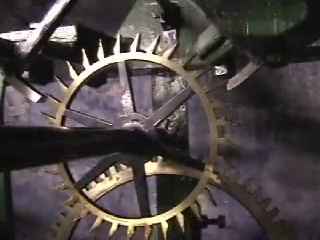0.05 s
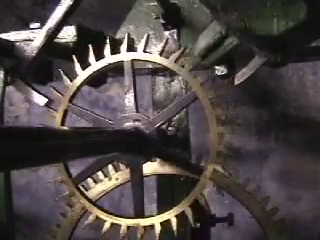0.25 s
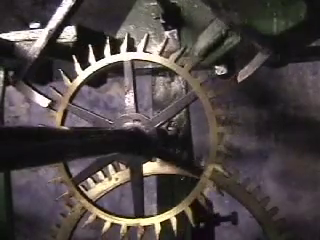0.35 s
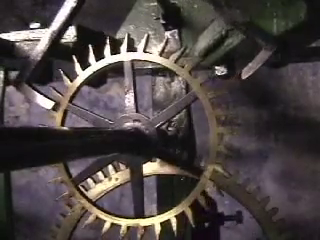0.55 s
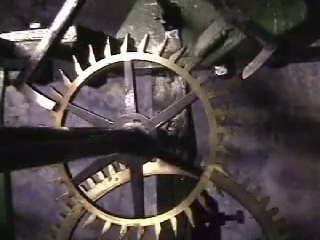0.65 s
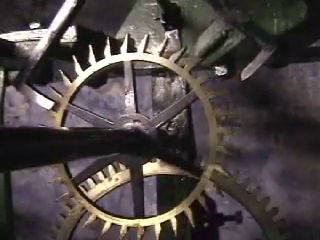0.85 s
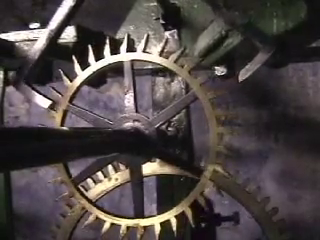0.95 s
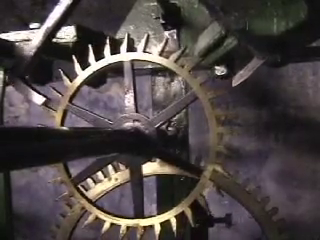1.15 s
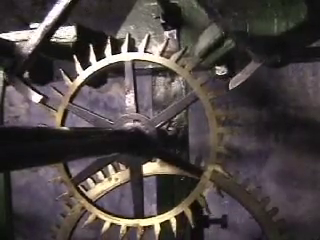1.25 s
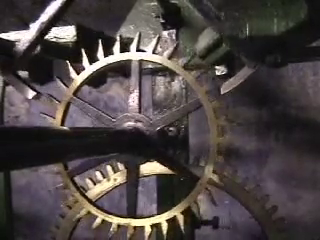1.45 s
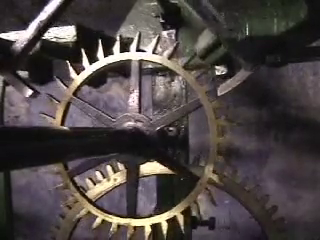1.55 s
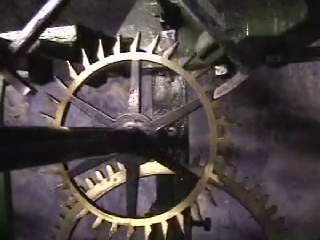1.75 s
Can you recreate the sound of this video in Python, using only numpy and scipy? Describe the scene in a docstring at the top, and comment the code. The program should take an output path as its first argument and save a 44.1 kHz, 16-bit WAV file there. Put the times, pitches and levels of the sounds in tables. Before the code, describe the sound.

A big clock escapement heard very close: one sharp, chattering metal clack, then over a second later another with a light tick just behind it, each ringing briefly over low hum, faint motor whine and hiss.

```python
"""Tower clock escapement, heard close

A tooth drops onto one pallet and, a swing later, onto the other, over hum, hiss and a small motor's whine.
Each drop is shaped noise for the chattering clang, decaying sines for wheel and anchor, swelling sines
for the boom of iron frame and small room, and a faint noise tail for the room's late answer.
Hum and motor are sines, the hiss is coloured noise; the recorder's gain dips at each drop."""
import sys
import numpy as np
from scipy import signal
from scipy.fft import rfft, irfft
from scipy.io import wavfile
from scipy.ndimage import uniform_filter1d

SR = 44100
rng = np.random.default_rng(int(sys.argv[2]) if len(sys.argv) > 2 else 0)


def dump(signal):
    """Clip the signal to [-1, 1] and save it as 16-bit WAV at the path in sys.argv[1]."""
    limited = np.clip(np.atleast_2d(signal).T, -1, 1)
    pcm = np.round(limited * 32767).astype(np.int16)
    wavfile.write(sys.argv[1], SR, pcm)


N = 79380
TIME_S, FREQ_HZ = np.arange(N) / SR, np.fft.rfftfreq(N, 1 / SR)
CONTACT_RISE_S = 0.00029  # time constant of the attack where metal meets metal


def amp(db):
    """Decibels to gain."""
    return 10 ** (np.asarray(db) / 20)


def unit(x):
    """Scales to rms 1."""
    return x / np.sqrt(np.mean(x ** 2) + 1e-20)


def read(hz, values):
    """A curve over frequency through the given points, on a log-frequency axis."""
    return np.interp(np.log(FREQ_HZ + 1), np.log(np.abs(hz)), values)


def bell(at_hz, centre_hz, octaves):
    """A Gaussian hump over log frequency; its standard deviation is given in octaves."""
    return np.exp(-.5 * (np.log2(at_hz / centre_hz) / octaves) ** 2)


def noise(gain):
    """Coloured noise for two nearly alike channels."""
    spread = .18  # weight of the part that is opposite in the two ears
    common, apart = rng.standard_normal((2, N))
    pair = common + spread * np.array([apart, -apart])
    return irfft(rfft(pair) * gain, N)


def decay(age, t60):
    """Exponential decay by 60 dB in t60 seconds."""
    return np.exp(-np.log(1000) * age / t60)


def fade(start, rise, t60):
    """An envelope that rises quickly and dies exponentially; silent before its start."""
    age = np.maximum(TIME_S - start, 0)
    return (1 - np.exp(-age / rise)) * decay(age, t60)


def tone(hz):
    """A sine of random phase."""
    return np.sin(2 * np.pi * (hz * TIME_S + rng.random()))


def wander(count):
    """Smooth random curve of rms 1 that changes over the given number of steps."""
    window = np.hanning(2 * int(count) + 3)
    return unit(signal.fftconvolve(rng.standard_normal(N), window, "same"))


def hum():
    """A low, slowly wavering hum: one sine whose phase sums its changing frequency."""
    # Each row: time in seconds, frequency in Hz, rms level in dB ahead of the microphones.
    hum_path = [(0, 50.1, -56), (.2, 50.8, -52), (.45, 51.65, -48.5), (.7, 51.04, -47), (.85, 51.65, -51.5),
                (1.0, 52.56, -48), (1.15, 52.64, -50), (1.35, 54.66, -50), (1.6, 55, -52), (1.8, 58.7, -62)]
    s, hz, db = np.transpose(hum_path)
    phase = 2 * np.pi * np.cumsum(np.interp(TIME_S, s, hz)) / SR
    return np.sqrt(2) * amp(np.interp(TIME_S, s, db)) * np.sin(phase)


def motor():
    """A small motor: a few clear lines over a fine buzz of high multiples of the shaft rate."""
    # The strongest lines. Each row: frequency in Hz, rms level in dB ahead of the microphones.
    whine_lines = [(449.5, -74), (599.4, -64), (1199, -75), (1349, -76.5), (1648, -73.5), (1798, -67.5),
                   (2347, -76), (2398, -78.5), (2997, -72), (3594, -71.5), (3817, -94), (3909, -72.5),
                   (4796, -73), (5395, -70.5), (5995, -80)]
    shaft_hz = 29.97
    buzz_db, line_spread_db, buzz_hz, buzz_octaves = -65.5, 7.5, 4020, 0.47
    whine = np.sqrt(2) * sum(amp(db) * tone(hz) for hz, db in whine_lines)
    orders_hz = shaft_hz * np.arange(25, 205)
    uneven = amp(line_spread_db * rng.standard_normal(len(orders_hz)))
    sizes = uneven * bell(orders_hz, buzz_hz, buzz_octaves)
    buzz = unit(sum(size * tone(hz) for size, hz in zip(sizes, orders_hz)))
    return whine + amp(buzz_db) * buzz


def hiss(left_db=2):
    """The quiet room and the microphones' own noise: the ears share less of it higher up."""
    # Colour of the hiss. Each row: frequency in Hz, relative density in dB per Hz.
    hiss_colour = [(25, -25), (55, -9), (90, -18.5), (130, -25), (180, -21), (300, -27.5), (500, -34),
                   (1000, -31), (1500, -37.5), (2100, -38), (4000, -36), (5800, -38.5), (6600, -43),
                   (7400, -55.5), (8200, -41), (9100, -35), (10200, -41.5), (11500, -47), (15000, -51),
                   (15800, -62)]
    # Each row: frequency in Hz, left-right likeness from 0 (separate) to 1 (the same).
    likeness = [(60, 0.85), (130, 0.82), (290, 0.2), (640, 0.58), (3100, 0.12), (6800, 0), (15000, 0)]
    hiss_db = -56.5  # rms over both channels before the left-right tilt
    left, other = rfft(rng.standard_normal((2, N)))
    same = np.clip(read(*np.transpose(likeness)), -1, 1)
    right = same * left + np.sqrt(1 - same ** 2) * other
    pair = irfft(np.array([left, right]) * amp(read(*np.transpose(hiss_colour))), N)
    return amp(hiss_db) * unit(pair) * amp([[left_db / 2], [-left_db / 2]])


def tick(start, db, hz, octaves, t60):
    """A light touch of metal on metal: a band of noise that dies quickly."""
    return amp(db) * unit(noise(bell(FREQ_HZ + 1, hz, octaves))) * fade(start, CONTACT_RISE_S, t60)


def clang(blows, pallet):
    """Countless close modes, fed by every contact; each band dies at its own rate."""
    # The dense clang of the works. Each row: frequency in Hz, relative density in dB per Hz
    # on the first pallet and on the second, t60 in seconds on the first and on the second.
    clang_bands = [(40, -29, -21, 0.54, .5), (90, -3.5, 1.5, 1, 0.73), (184, 3.5, 0.5, 0.54, 0.67),
                   (283, 2, 5.5, 0.43, 0.39), (480, 4.5, 1.5, 0.36, 0.41), (725, 3.5, 3, 0.29, 0.36),
                   (1120, 0, -5.5, 0.24, 0.37), (1670, 5, 8, 0.21, 0.22), (2400, -1, 1, 0.2, 0.2),
                   (3030, 3, 9, 0.17, 0.14), (4200, 1, -1, 0.18, 0.15), (5430, 1, 4.5, 0.26, 0.21),
                   (6620, -6.5, -2.5, 0.22, 0.17), (7500, -11.5, -15, 0.18, 0.29),
                   (8100, 1, 4.5, 0.21, 0.23), (10040, 1, -1.5, 0.19, 0.22),
                   (11100, -18, -10.5, 0.18, 0.19), (13100, -4, -8, 0.14, .17),
                   (15500, -15, -14, 0.12, 0.14)]
    clang_db = -16.5
    bloom_s = 0.012  # build-up at 100 Hz; shorter higher up
    crack_share, crack_s = 0.83, 0.066  # direct crack of each contact: share, t60
    clatter_db, clatter_s = 2, 0.0026  # uneven chatter: depth, grain
    ripple_db, ripple_hz = 2, 75.6  # some clusters of modes stand out: depth, width
    hz, *columns = np.transpose(clang_bands)
    db, t60 = columns[pallet], columns[2 + pallet]
    ripple = ripple_db * wander(ripple_hz * N / SR)[:len(FREQ_HZ)]
    spectrum = rfft(noise(amp(read(hz, db) + ripple)))
    out = np.zeros((2, N))
    for share, f, band_t60 in zip(np.eye(len(hz)), hz, t60):
        rise = CONTACT_RISE_S + bloom_s * 100 / f * min(1, 500 / f) ** .5
        power = 0
        for s, level, tilt in blows:
            envelope = fade(s, rise, band_t60) + crack_share * fade(s, rise, crack_s)
            power += (amp(level + tilt * np.log2(f / 3000)) * envelope) ** 2
        out += irfft(spectrum * read(hz, share), N) * np.sqrt(power)
    return amp(clang_db + clatter_db * wander(clatter_s * SR)) * out


def ring(blows, pallet):
    """The clear modes of wheel and anchor: sines topped up in power by every contact."""
    # Each row: frequency in Hz, relative level in dB on the first pallet and on the second,
    # t60 in seconds on the first and on the second.
    ring_modes = [(388.8, -34, -44, 0.47, 0.25), (429.2, -35.5, -25, 0.33, 0.29),
                  (480, -58, -30.5, .35, 0.3), (701, -26, -24, 0.29, 0.26), (754, -28, -30, 0.29, 0.41),
                  (950, -27, -28, 0.16, 0.22), (1114, -33, -36.5, 0.27, 0.47),
                  (1489, -27.5, -21, 0.25, 0.22), (1757, -27, -24.5, 0.13, 0.18),
                  (1843, -27, -39, 0.13, 0.16), (2254, -35, -30, 0.35, 0.19),
                  (2651, -28, -16.5, 0.18, 0.086), (2747, -22.5, -28, 0.14, 0.23),
                  (2920, -34, -31, 0.23, 0.3), (3190, -37, -18.5, 0.11, 0.11),
                  (3690, -19, -34, 0.053, 0.097), (4170, -22, -24, 0.1, 0.1), (4237, -42, -29, 0.28, 0.25),
                  (4390, -40, -23, .2, 0.13), (4486, -18.5, -32, .21, .22), (4760, -50, -32, 0.28, 0.29),
                  (5340, -28, -34, 0.16, 0.22), (5256, -20, -22, 0.15, 0.23),
                  (5298, -19.5, -29, 0.18, 0.21), (5413, -27.5, -22.5, 0.39, 0.22),
                  (5920, -31.5, -28, 0.34, .22), (6320, -33, -25, 0.2, 0.24), (7530, -34, -28.5, 0.17, 0.2),
                  (8220, -19, -34, 0.21, 0.23), (8520, -23, -18, 0.23, .23), (8660, -28, -22, 0.2, 0.19),
                  (9340, -25, -34, 0.11, .18), (9450, -22.5, -21.5, 0.15, 0.21),
                  (9450, -14.5, -40, 0.15, 0.19), (9660, -51, -24.5, 0.17, .2),
                  (9939, -23.5, -31, 0.17, .18), (10510, -27, -42, 0.17, 0.15),
                  (10839, -46, -36, .17, 0.19), (11570, -27.5, -33, 0.13, 0.18),
                  (12300, -30, -42, 0.12, .17)]
    ring_db = -2.5
    out = 0
    for hz, *row in ring_modes:
        power = sum((amp(db) * fade(s, CONTACT_RISE_S, row[2 + pallet])) ** 2 for s, db, _ in blows)
        out = out + amp(row[pallet]) * tone(hz) * np.sqrt(power)
    return amp(ring_db) * out


def boom(start, low_modes):
    """Low modes of frame and room, which swell before they fade."""
    out = 0
    for hz, db, swell, t60 in low_modes:
        growth = np.clip((TIME_S - start) / swell, 0, 1) ** 3
        fall = decay(np.maximum(TIME_S - start - swell, 0), t60)
        out = out + amp(db) * tone(hz) * growth * fall
    return out


def room(start):
    """The room's faint late answer: a dull noise tail that reaches each ear on its own."""
    # Each row: frequency in Hz, relative density in dB per Hz, t60 in seconds.
    room_bands = [(40, -13, 1.1), (120, -3, 1.3), (300, -1.5, 1), (780, -4, 1.1), (2820, -6, 0.81),
                  (5500, -16, 0.5), (7500, -40, .3), (15000, -50, .25)]
    room_db, rise_s = -30.5, 0.027
    hz, db, t60 = np.transpose(room_bands)
    spectrum = rfft(rng.standard_normal((2, N))) * amp(room_db + read(hz, db))
    return sum(irfft(spectrum * read(hz, share), N) * fade(start, rise_s, band_t60)
               for share, band_t60 in zip(np.eye(len(hz)), t60))


def drop(blows, low_modes, pallet):
    """A tooth lands on a pallet; boom and room tail start from the main blow."""
    start = blows[0][0]
    return clang(blows, pallet) + ring(blows, pallet) + boom(start, low_modes) + room(start)


def microphones(x):
    """A close pair of ports: the low end leans left; around 8 kHz the two fall out of step."""
    # How the pair hears the works. Each row: frequency in Hz, left minus right in dB,
    # left lead in radians.
    ports = [(50, 7.3, 0), (200, 5, 0), (700, 4, -.15), (2400, 1.6, -.2), (5400, -.2, 0), (6400, 0, 0),
             (7700, 1.5, 2.4), (8600, 2.5, 2.4), (9400, 4, -.6), (11400, .5, .3), (12600, .4, -.7),
             (16000, 0, -.5)]
    hz, db, lead = np.transpose(ports)
    half = amp(read(hz, db) / 2) * np.exp(.5j * read(hz, lead))  # each side takes half the difference
    return irfft(rfft(x) * np.array([half, 1 / half]), N)


def scene():
    """Two beats of the clock over the room's steady sounds."""
    # The contacts of each drop, the main blow first. Each row: time in seconds,
    # relative level in dB, tilt of the clang in dB per octave about 3 kHz.
    blows_first, blows_second = [(.2455, 4, 0), (.2426, -6, -2), (.2565, -9.5, 3), (0.262, -3, -2.5),
                                 (.2795, -4.5, -1.5), (.2845, -12, -1.5)], [(1.4308, 4.5, 0), (1.4275, -17, 1), (1.441, -6, -1),
                                                  (1.468, -16, 0.12), (1.494, -20, 1.9)]
    # Low modes of frame and room. Each row: frequency in Hz, level in dB, swell in seconds,
    # t60 in seconds.
    boom_first, boom_second = [(88.3, -34, 0.088, 0.23), (94.6, -36.5, 0.19, 0.2), (100, -45.5, 0.358, .25),
                               (170, -43, 0.12, .35), (198, -23.5, 0.036, 0.11),
                               (267.8, -32.5, 0.091, 0.46)], [(79, -40.5, 0.11, 0.33), (100.5, -50, 0.18, 0.82),
                                               (164.5, -37.5, 0.049, 0.31), (210, -33, 0.026, 0.32),
                                               (272.3, -29, 0.057, 0.3), (264.2, -38.5, .18, 0.27)]
    # Small ticks of slack in the wheels. Each row: start in seconds, level in dB,
    # centre in Hz, width in octaves, t60 in seconds.
    slack_ticks = [(0.218, -54.5, 3380, 0.68, 0.17), (1.361, -53.5, 1270, 1.36, 0.31),
                   (1.3725, -43, 3380, 0.3, 0.042), (1.5269, -26.5, 4810, 0.18, 0.11),
                   (1.527, -35.5, 3030, 0.54, 0.16)]
    steady = hum() + motor()
    ticks = sum(tick(*row) for row in slack_ticks)
    drops = drop(blows_first, boom_first, 0) + drop(blows_second, boom_second, 1)
    return microphones(steady + ticks + drops) + hiss()


def record(dry):
    """The recorder's gain control falls on each blow and recovers; then the band limit."""
    limit_db, squeeze = -27.5, 0.49  # threshold; share of the excess in dB that is taken off
    follower_db_per_s = 130  # how fast the held level falls
    edge_hz = 15600
    power = uniform_filter1d((dry ** 2).mean(0), size=160, origin=20)
    power_db = 10 * np.log10(abs(power) + 1e-12)
    fall_db = TIME_S * follower_db_per_s
    held_db = np.maximum.accumulate(power_db + fall_db) - fall_db  # peaks held on a falling slope
    over_db = np.maximum(held_db - limit_db, 0)
    ducked = dry * amp(-squeeze * uniform_filter1d(over_db, size=100))
    low_pass = signal.firwin(255, edge_hz, window=("kaiser", 9), fs=SR)
    return signal.oaconvolve(ducked, low_pass[None], "same")


dry = scene()
out = record(dry)
dump(out)
```